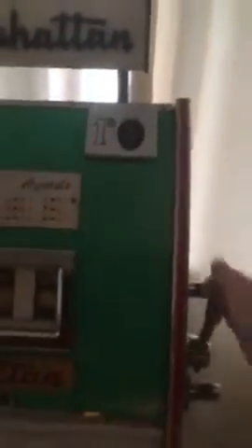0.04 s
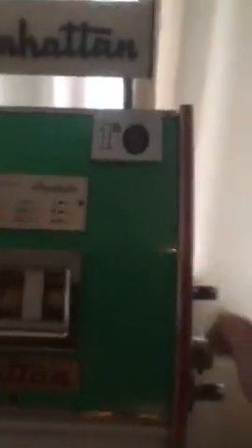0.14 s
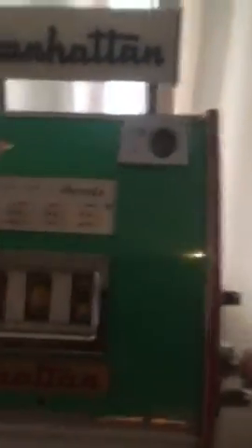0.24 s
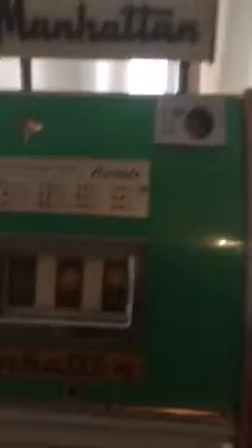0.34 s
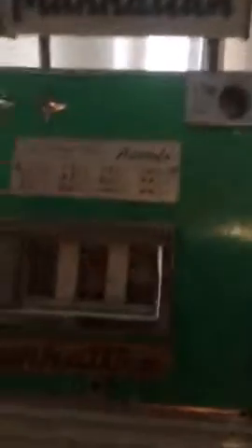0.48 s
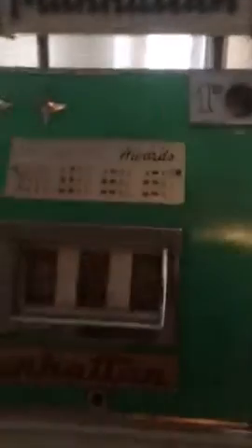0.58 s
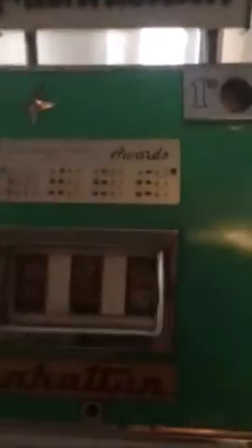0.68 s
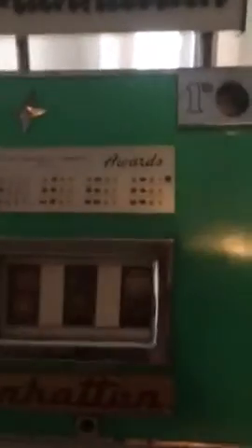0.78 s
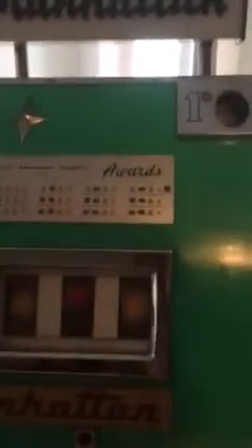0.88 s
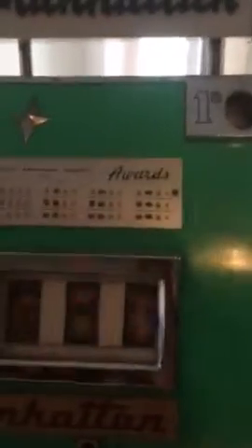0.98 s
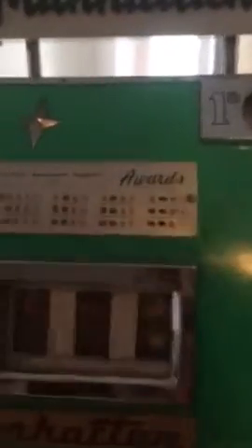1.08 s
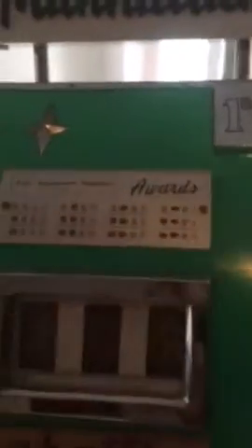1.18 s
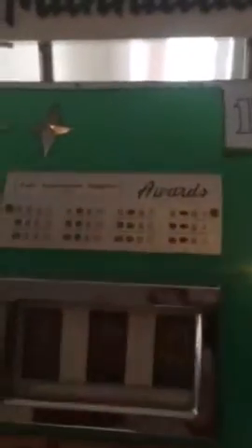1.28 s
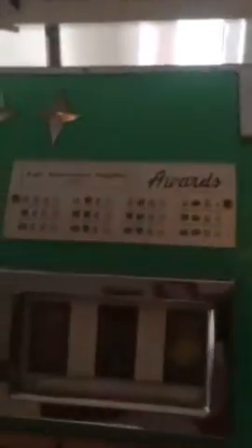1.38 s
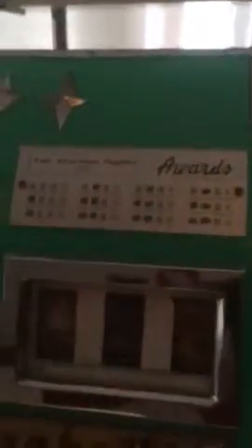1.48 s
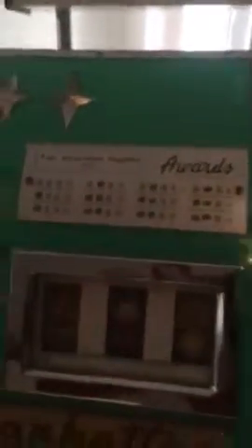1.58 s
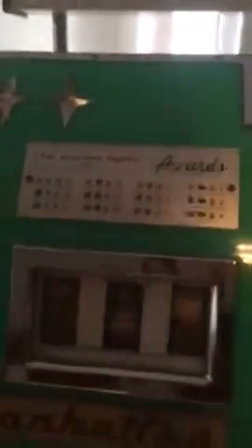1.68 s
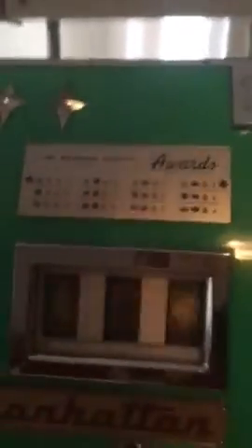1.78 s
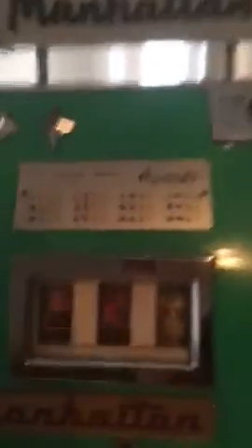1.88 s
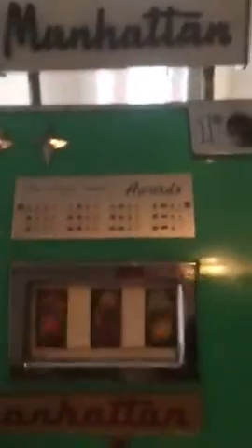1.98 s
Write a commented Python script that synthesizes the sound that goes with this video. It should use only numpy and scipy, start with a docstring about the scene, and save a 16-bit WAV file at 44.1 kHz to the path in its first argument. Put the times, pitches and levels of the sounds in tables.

```python
"""In a quiet, faintly humming room, the lever of an old coin-operated reel machine is pulled and its ratchet clicks.
Next the works clunk in bursts of crunchy noise, small parts ping, and jolts make the wooden cabinet boom.
A coin tumbles down its metal chute: coin, plate and gate ring as sets of fading sine tones at every knock.
Last, the clockwork timer ticks on, ever more slowly, as short clicks that set its escapement ringing.
Soft coloured noise for the room and a deep rumble that swells and sinks lie under it all."""
import sys
import numpy as np
from scipy import signal
from scipy.fft import rfft, irfft
from scipy.io import wavfile

SR = 44100
rng = np.random.default_rng(int(sys.argv[2]) if len(sys.argv) > 2 else 0)


def volts(x):
    """Linear amplitude factor 10**(x/20) for a level x in dB, scalar or array-like."""
    e = np.asarray(x, float) / 20
    return 10 ** e


def generate_wav(sig):
    """Save sig (samples, or channels by samples) to the path in sys.argv[1] as 16-bit PCM at SR."""
    pcm = np.round(np.clip(np.atleast_2d(sig).T, -1, 1) * 32767).astype(np.int16)
    wavfile.write(sys.argv[1], SR, pcm)


N = 88200  # two seconds of samples

# A fade time (t60) is the time to fall by 60 dB. A tilt above zero favours high notes.

# Room air, shape of its spectrum: pitch_hz, relative_level_db (per Hz)
ROOM_AIR_COLOUR = [(35, -54), (60, -10.5), (133, -15), (172, -29), (207, 1), (244, -11), (651, -24.5),
                   (903, -18.5), (2520, -25), (16000, -46.5)]
# The cabinet hums along with the spinning reels: pitch_hz, width_hz, level_db
CABINET_HUM = [(149, 4.5, -65), (201, 3.52, -62.5)]
# Deep rumble of the stand and the hand-held microphone: start_s, level_db
RUMBLE_LEVEL = [(0, -77), (.2, -62), (.55, -44.5), (.9, -62.5), (1.2, -77.5), (1.32, -44.5), (1.501, -55),
                (1.65, -69.5), (2, -66.5)]
# Lower and upper edge of that rumble: pitch_hz
RUMBLE_EDGES_HZ = [36, 127]
# The ratchet pawl drops over a tooth: start_s, level_db, tilt_db_per_octave, t60_s (at the pivot pitch)
RATCHET_CLICKS = [(0.1004, -26, 0.4, 0.12), (0.1535, -23.5, 0.6, 0.074), (0.1991, -25, -0.6, 0.12),
                  (0.244, -25, -1.6, 0.1), (0.2585, -35.5, 5.5, 0.16), (0.3056, -26, -0.3, 0.13)]
# Tone colour of the ratchet's clack: pitch_hz, relative_level_db
RATCHET_TONE = [(300, -5), (961, -3.5), (1280, 4), (2170, -23), (2400, -2), (4090, -2.5), (9390, -7.5),
                (16000, -19.5)]
# Ringing notes of the pawl: pitch_hz, relative_level_db, t60_s
PAWL_NOTES = [(1294, -10, 0.07), (1469, -10.5, 0.082), (2730, -10.5, 0.089), (3550, -5, 0.026)]
# Jolts to the cabinet; the spot struck favours notes near one pitch: start_s, level_db, favoured_hz
CABINET_JOLTS = [(0.2, -47.5, 195), (0.247, -40, 185), (0.372, -27, 249), (.398, -34.5, 164),
                 (0.441, -36, 197), (0.481, -22, 228), (0.499, -22, 149), (0.541, -24.5, 200),
                 (0.585, -29.5, 176), (.64, -27.5, 208), (0.691, -33, 169.4), (0.848, -40.5, 181),
                 (.91, -47.5, 163), (1.02, -40, 205), (1.1, -41.5, 199), (1.142, -39.5, 170),
                 (1.189, -43, 159), (1.258, -36, 160), (1.292, -30.5, 139), (1.32, -29, 210),
                 (1.395, -39.5, 163)]
# Ringing notes of the wooden cabinet: pitch_hz, relative_level_db, t60_s
CABINET_NOTES = [(126.6, -2, 0.18), (160.8, 2, 0.31), (208, -0.5, 0.54), (259.5, -0.5, 0.14),
                 (408.2, -9.5, 0.41), (614, -6, 0.084)]
# Small parts that answer a blow with one clear note: start_s, level_db, pitch_hz, t60_s
SMALL_PART_PINGS = [(.26, -33.5, 3550, 0.082), (.261, -32.5, 972, 0.05), (.965, -36.5, 5650, 0.22),
                    (1.139, -31, 2380, 0.057), (1.918, -41.5, 875, 0.042)]
# Metal parts of works and chute clash: start_s, level_db, tilt_db_per_octave, t60_s (at the pivot pitch)
METAL_CLASHES = [(0.3532, -25, -5, 0.24), (0.371, -25, 1.5, 0.1), (0.383, -14, 1.8, 0.12),
                 (0.4398, -12.5, 0, 0.11), (0.4787, -1, -0.5, 0.064), (0.5044, -15, -5.5, 0.17),
                 (0.5778, -28.5, 2.5, 0.06), (0.6194, -10.5, -0.1, 0.16), (0.6424, -19.5, -3.5, 0.14),
                 (0.6752, -20, 0.3, 0.16), (0.7602, -28.5, 2.5, 0.16), (0.828, -17.5, -0.6, 0.063),
                 (0.8402, -15.5, 3.5, 0.17), (.897, -43.5, 10, .06), (0.929, -35, 3, 0.22),
                 (0.9766, -40, -3.5, 1), (.99, -36.5, 9.5, 0.066), (1.0161, -21, -0.5, 0.14),
                 (1.0285, -17.5, 10.5, 0.05), (1.0954, -29, 5.5, 0.17), (1.1375, -17, -3.3, 0.057),
                 (1.248, -27.5, -6.1, 0.12), (1.26, -26, -5, 0.046), (1.29, -36.5, -8.5, 0.19),
                 (1.3134, -46.5, 7, 0.058), (1.5374, -44, -1.5, 0.058), (1.918, -37, -6.5, 0.034)]
# Tone colour of the clashes: pitch_hz, relative_level_db
CLASH_TONE = [(300, -18), (645, -15.5), (1410, -10), (3640, -12), (6200, -11.5), (9880, -15.5),
              (16000, -33)]
# Ringing notes of the iron frame that carries the works: pitch_hz
FRAME_NOTES_HZ = [905, 1040, 1320, 1511, 1625, 1975]
# The chute plate is knocked: start_s, level_db, tilt_db_per_octave
CHUTE_KNOCKS = [(0.622, -38, 4), (0.644, -36, 1), (.676, -44, 4), (0.761, -35.5, 0), (.829, -46, 3)]
# Ringing notes of the chute plate: pitch_hz, relative_level_db, t60_s
CHUTE_NOTES = [(2810, 0, 0.08), (4565, -8, .13), (4820, -12, 0.3), (6050, -9, 0.07), (8660, -12, 0.09),
               (9012, -10, .6), (10910, -11, 0.13), (14290, -24, 0.11)]
# The coin is knocked: start_s, level_db, tilt_db_per_octave
COIN_HITS = [(0.634, -36, 11.5), (0.677, -40.5, 6), (0.772, -55, 5), (0.84, -33, 1), (0.859, -26.5, 3),
             (1.018, -27, 9), (1.031, -35.5, 4.5), (1.064, -48, 7), (1.095, -48.5, 3.5)]
# Ringing notes of the coin: pitch_hz, relative_level_db, t60_s
COIN_NOTES = [(3391, -10, 0.2), (4296, -15, 0.16), (5650, -16, 0.5), (6598, -18, 0.25), (9350, -22, .25),
              (9862, -2, 0.24), (10710, -27, .2), (11340, -26, 0.2), (12915, -14, 0.28), (14740, -27, .12)]
# The coin gate is knocked: start_s, level_db, tilt_db_per_octave
GATE_HITS = [(.977, -39, 3.5), (.992, -39.5, -14)]
# Ringing notes of the coin gate: pitch_hz, relative_level_db, t60_s
GATE_NOTES = [(6600, -6, 0.09), (8220, -6, 0.1), (9330, 0, 0.15), (12530, -17, .1), (14030, -8, 0.15)]
# Strength of the timer's ticks: start_s, level_db
TICK_LEVEL = [(1.15, -54.5), (1.4, -52.5), (1.6, -58), (1.68, -49), (1.76, -56), (1.95, -54)]
# Ringing notes of the timer's escapement: pitch_hz, relative_level_db, t60_s
ESCAPEMENT_NOTES = [(885, -11.5, 0.11), (2405, -3, 0.025), (2637, -5.5, 0.025), (3290, -6.5, 0.0054),
                    (4070, -10, 0.0081), (5550, -15, 0.0058), (6560, -15, 0.007)]

KNOCK_SPREAD_DB = 1.2  # chance differences between the notes of a knock
CONTACT_S, DAMPED_T60_S = 0.002, 0.045  # swell of small metal parts, and their fade once touched again
TUMBLE_DB = 3.5  # depth of their unsteady ringing


def at_hz(points, hz):
    """Reads a curve of pitch and level, with straight lines on a log-frequency axis."""
    curve_hz, curve_db = np.array(points).T
    return np.interp(np.log(hz), np.log(curve_hz), curve_db)


def room_tone():
    """Steady air: noise whose spectrum is shaped to the colour of the room."""
    hz = np.maximum(np.arange(N // 2 + 1) * SR / N, 1)
    air = irfft(rfft(rng.standard_normal(N)) * volts(at_hz(ROOM_AIR_COLOUR, hz)), N)
    return volts(-61) * air / air.std()


def ring(push, hz, t60):
    """A resonator: a click of height 1 sets a fading sine ringing, starting at height 1."""
    shrink = volts(-60 / (max(t60, 0.005) * SR))  # per sample
    turn = 2 * np.pi * hz / SR
    # the tiny offset keeps the filter from slowing down in silence
    return signal.lfilter([0, np.sin(turn)], [1, -2 * shrink * np.cos(turn), shrink ** 2], push + 1e-18)


def cabinet_hum():
    """Noise drives narrow resonators, so each low note wavers faintly."""
    out = np.zeros(N)
    for centre_hz, width_hz, db in CABINET_HUM:
        t60 = np.log(1000) / (np.pi * width_hz)  # a narrower note rings longer
        hum = ring(rng.standard_normal(N), centre_hz, t60)
        out += volts(db) * hum / hum.std()
    return out


def rumble():
    """Low band of noise that swells and sinks."""
    band = signal.butter(5, RUMBLE_EDGES_HZ, "band", fs=SR, output="sos")
    deep = signal.sosfilt(band, rng.standard_normal(2 * N))[N:]  # skip the filter's start
    level_db = np.interp(np.arange(N) / SR, *np.transpose(RUMBLE_LEVEL))
    return deep / deep.std() * volts(level_db)


def knocked(modes, times, level_db, spread_db):
    """Each knock strikes all notes of a body, each by a chance strength; neighbours move in opposition."""
    out = np.zeros(N)
    chance = rng.standard_normal((len(times), len(modes)))
    for k, (hz, mode_db, t60) in enumerate(modes):
        clicks = np.zeros(N)
        clicks[(times * SR).astype(int)] = volts(level_db + mode_db + spread_db * chance[:, k])
        out += ring(clicks, hz, t60) * (-1) ** k
    return out


def bursts(rows, colour):
    """Crunchy noise that dies band by band after each blow; the hollow cabinet and room carry it on."""
    pivot_hz, lows_last_longer, rise_s = 2574, 0.32, 0.0011
    echo_db, echo_t60_s = -17, 0.27  # the echo's fade time holds at the pivot pitch
    crunch_db, rattle_db, rattle_per_s = 4.5, 2, 600
    edges = 300 * 2 ** np.arange(0, 5.9, 0.4)  # band edges in Hz
    t = np.arange(SR // 2) / SR

    # single samples jump in strength; loose parts that touch many times add slower jumps
    jumps = np.minimum(rng.exponential(1, (2, N)), 3) - 2
    grit = rng.standard_normal((2, N)) * volts(crunch_db * jumps)
    rattle = np.interp(np.arange(N) * rattle_per_s / SR, np.arange(N), rng.standard_normal(N))
    grit = grit * volts(rattle_db * rattle)
    smooth = rng.standard_normal((2, N))

    out = np.zeros(N)
    for k, (low, high) in enumerate(zip(edges, edges[1:])):
        hz = np.sqrt(low * high)
        stretch = (pivot_hz / hz) ** lows_last_longer
        near, echo_power = np.zeros(N + len(t)), np.zeros(N + len(t))
        for s, db, tilt_db, t60 in rows:
            gain = volts(db + at_hz(colour, hz) + tilt_db * np.log2(hz / pivot_hz))
            i = int(s * SR)
            fall = volts(-60 * t / (max(t60, 0.01) * stretch))
            near[i:i + len(t)] += gain * (1 - np.exp(-t / rise_s)) * fall
            echo = gain * volts(echo_db - 60 * t / (echo_t60_s * stretch))
            echo_power[i:i + len(t)] += echo ** 2
        noise = near[:N] * grit[k % 2] + np.sqrt(echo_power[:N]) * smooth[k % 2]
        band = signal.butter(2, [low, high], "band", fs=SR, output="sos")
        out += signal.sosfilt(band, noise + 1e-18)
    return out


def ratchet():
    """A dry clack of noise at each tooth, and the short ring of the pawl."""
    times, level_db = np.transpose(RATCHET_CLICKS)[:2]
    clack = bursts(RATCHET_CLICKS, RATCHET_TONE)
    return clack + knocked(PAWL_NOTES, times, level_db - 8.5, KNOCK_SPREAD_DB)


def reknocked(modes, times, levels_db, rise_s, damped_t60, waver_db):
    """Notes swell over the contact, waver, and die fast once the body is touched again."""
    waver_per_s = 130
    t = np.arange(SR // 3) / SR
    hz, mode_db, t60 = np.transpose(modes)[:, :, None]
    out = np.zeros(N + len(t))
    sign = (-1.0) ** np.arange(len(modes))[:, None]
    swell = 1 - np.exp(-t / rise_s)
    free_times = np.diff(times, append=N / SR)  # time until the next touch
    for s, free_s, db in zip(times, free_times, levels_db):
        chance = rng.standard_normal((len(modes), 40))
        waver = np.array([np.interp(t * waver_per_s, np.arange(40), row) for row in chance])
        fall_db = 60 * t / t60 + 60 * np.maximum(t - free_s, 0) / damped_t60
        height = volts(db[:, None] + mode_db + waver_db * waver - fall_db)
        tones = sign * height * np.sin(2 * np.pi * hz * t)
        i = int(s * SR)
        out[i:i + len(t)] += tones.sum(axis=0) * swell
    return out[:N]


def cabinet_boom():
    """Soft jolts set the wooden box booming; notes far from the favoured pitch are weaker."""
    times, level_db, favoured_hz = np.transpose(CABINET_JOLTS)[:, :, None]
    octaves_away = np.abs(np.log2(np.transpose(CABINET_NOTES)[0] / favoured_hz))
    loss_db = np.minimum(25.5 * octaves_away, 13.5)  # dB per octave, up to a limit in dB
    return reknocked(CABINET_NOTES, times[:, 0], level_db - loss_db,
                     rise_s=0.0031, damped_t60=0.052, waver_db=1.0)


def pings():
    """Each small part swells over a short contact and rings unsteadily on one note."""
    out = np.zeros(N)
    for s, db, hz, t60 in SMALL_PART_PINGS:
        out += reknocked([(hz, db, t60)], [s], np.zeros((1, 1)), CONTACT_S, DAMPED_T60_S, TUMBLE_DB)
    return out


def clashes():
    """Metal clashes as bursts of noise, which also set the iron frame ringing."""
    blows = bursts(METAL_CLASHES, CLASH_TONE)
    frame = sum(ring(blows, hz, t60=0.1) for hz in FRAME_NOTES_HZ)
    return blows + volts(-51) * frame


def jingle(modes, knocks):
    """Tumbling metal: wear splits each note into a beating pair; each knock leans to high or low notes."""
    twins = [(hz * 1.004, db - 6, t60) for hz, db, t60 in modes]
    modes = list(modes) + twins
    times, level_db, tilt_db = np.transpose(knocks)[:, :, None]
    octaves = np.log2(np.transpose(modes)[0] / 8000)  # the tilt pivots at 8000 Hz
    chance = rng.standard_normal((len(knocks), len(modes)))
    levels_db = level_db + tilt_db * octaves + KNOCK_SPREAD_DB * chance
    return reknocked(modes, times[:, 0], levels_db, CONTACT_S, DAMPED_T60_S, TUMBLE_DB)


def coin_drop():
    """Chute plate, coin and gate each ring in their own notes until the next touch damps them."""
    plate = jingle(CHUTE_NOTES, CHUTE_KNOCKS)
    coin = jingle(COIN_NOTES, COIN_HITS)
    gate = jingle(GATE_NOTES, GATE_HITS)
    return plate + coin + gate


def timer():
    """Ticks and weaker tocks alternate, every third tick bites harder, and the clockwork loses speed."""
    start_s, tick_gap_s, gap_grows_s = 1.1337, 0.02385, 0.000046  # gap from tick to tick, growth per tick
    tock_db, every_third_db, spread_db, jitter_s = -5, 2, 1, 0.0005
    beat = np.arange(0, 35.5, 0.5)  # whole numbers are ticks, halves are tocks
    chance = rng.standard_normal((len(beat), 2))
    times = start_s + tick_gap_s * beat + gap_grows_s * beat ** 2 / 2 + jitter_s * chance[:, 1]
    level_db = np.interp(times, *np.transpose(TICK_LEVEL))
    level_db = level_db + tock_db * (beat % 1 > 0) + every_third_db * (beat % 3 == 0)
    return knocked(ESCAPEMENT_NOTES, times, level_db + spread_db * chance[:, 0], spread_db=1.5)


def scene():
    """Adds all the parts into one channel."""
    background = room_tone() + cabinet_hum() + rumble()
    works = ratchet() + cabinet_boom() + pings() + clashes()
    return (background + works + coin_drop() + timer())[None]


def top_cut(x):
    """Nothing passes above the cut-off."""
    return signal.sosfilt(signal.butter(12, 16820, fs=SR, output="sos"), x)


def record(dry):
    """Passes the finished mix on through the recorder's treble cut-off, with no other change of level or tone."""
    return top_cut(dry)


dry = scene()
out = record(dry)
generate_wav(out)
```